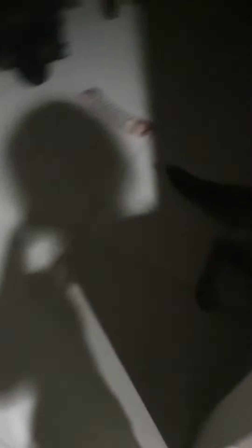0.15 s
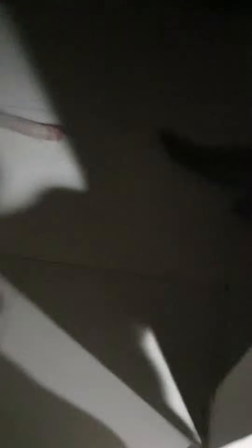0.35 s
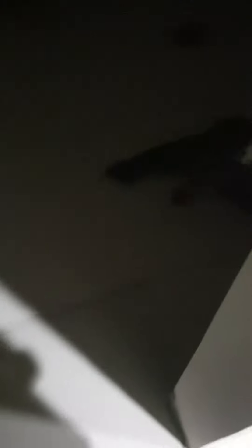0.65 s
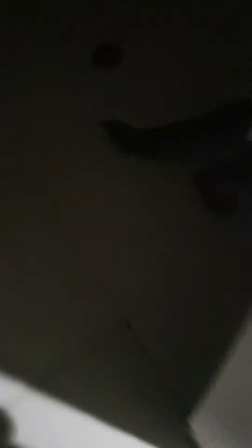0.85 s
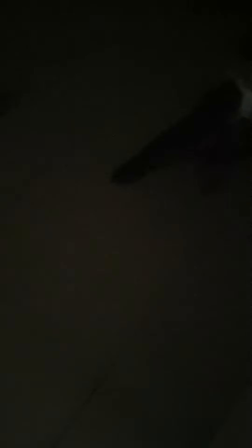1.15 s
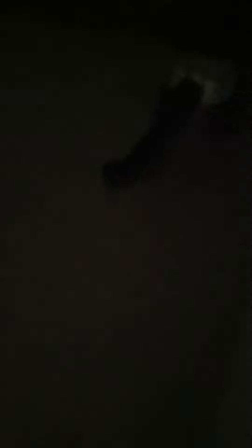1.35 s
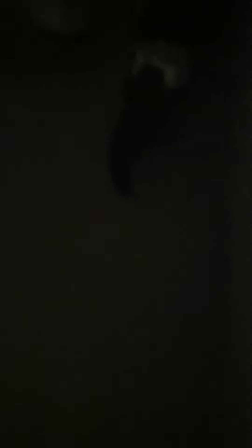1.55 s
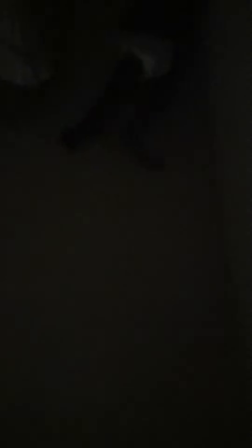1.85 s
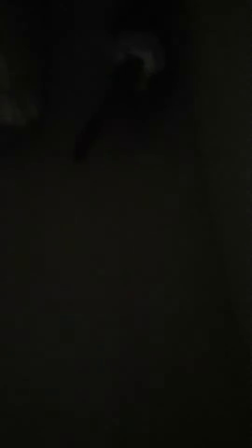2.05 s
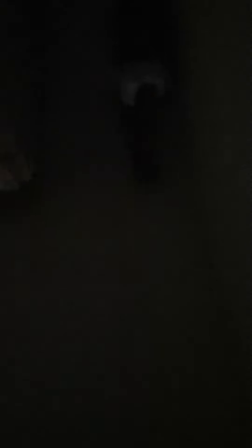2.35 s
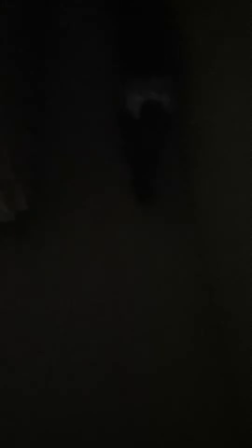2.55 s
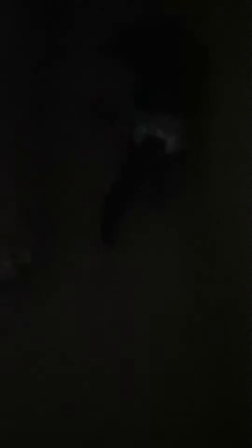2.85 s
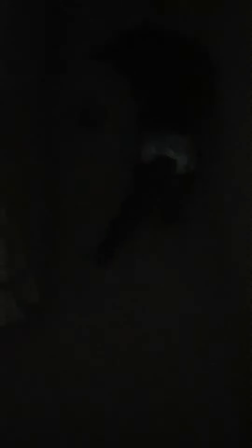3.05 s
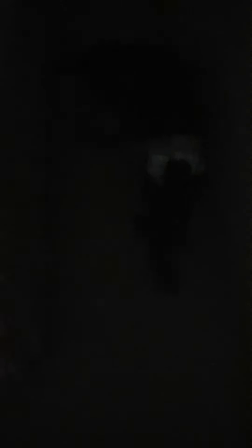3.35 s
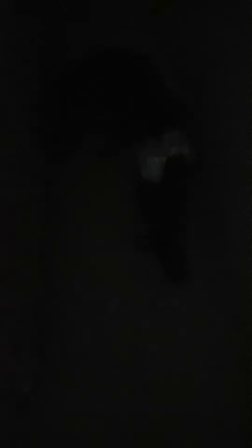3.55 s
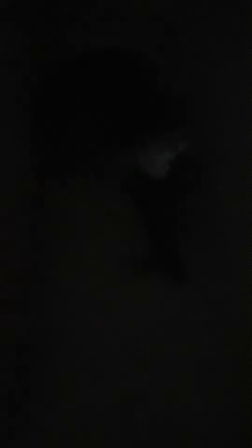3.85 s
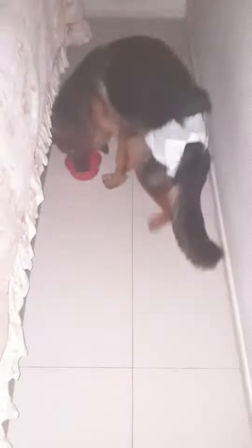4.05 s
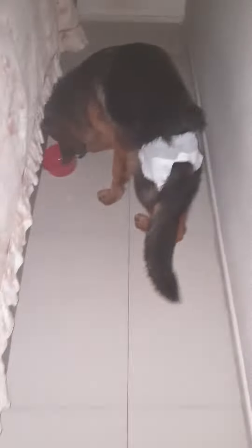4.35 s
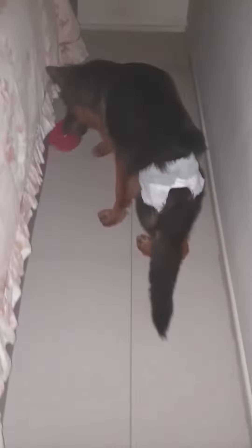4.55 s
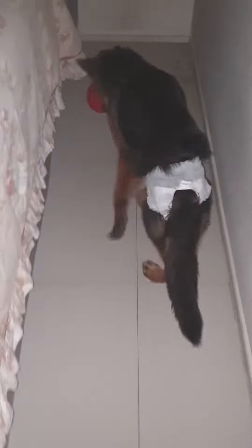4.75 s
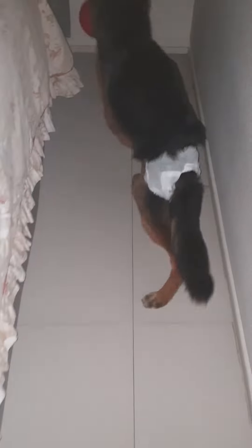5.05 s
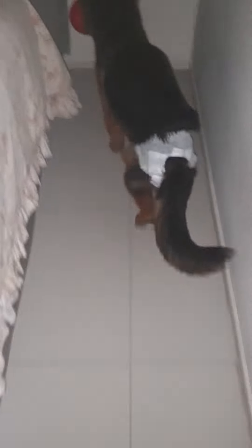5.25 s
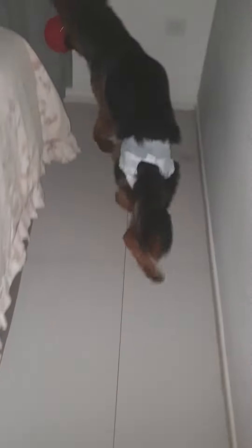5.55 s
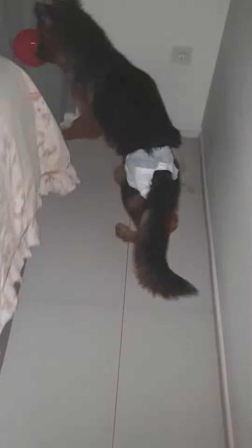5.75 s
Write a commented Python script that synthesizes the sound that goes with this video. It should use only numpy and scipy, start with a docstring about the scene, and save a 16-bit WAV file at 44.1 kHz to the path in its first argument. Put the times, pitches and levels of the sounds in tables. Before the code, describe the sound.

A soft, low house murmur runs throughout, swelling slightly near 1.7 s. Faint airy scuffs open the clip, followed by tiny claw ticks at 0.5 s and from 1.2 to 1.75 s, with very dull footfalls. At 1.8 s a hollow plastic ball knocks the tiles in a quick cluster, then rolls and scuffs faintly under a barely audible hum. A sharp slap at 2.3 s precedes the loudest event: hollow, hard clacks at 2.55-2.63 s, fluttering off close walls with a brief ringing tail. Lighter knocks, claws, pad hiss and rolling continue from 2.75 to 3.7 s, including a crisp slap at 3.3 s and a small low phone jolt just before it. At 4.1-4.2 s a slap and a higher-pitched ball pop sound, then busy claw ticks and thuds until 4.5 s. The rest is quiet, with sparse ticks, faint scuffs and soft low handling movements until 5.9 s.

```python
"""A quiet house murmurs and a brief soft scuff or two passes, then claws tick on tiles.
A young dog chases a hollow plastic ball along a tiled passage, a few metres from a hand-held phone.
Ball and footfalls are ringing modes, claws are band-passed clicks, rolling and scuffs are shaped noise.
Hard walls ring on as echoes and a noise tail; jolts of the phone are short low swings, a faint hum a sine."""
import sys
import numpy as np
from scipy import signal
from scipy.fft import rfft, irfft
from scipy.io import wavfile
from scipy.ndimage import uniform_filter1d

SR = 44100
rng = np.random.default_rng(int(sys.argv[2]) if len(sys.argv) > 2 else 0)


def log_audio(samples):
    """Write samples as a 16-bit WAV file to the path given in sys.argv[1]."""
    # one column per channel
    frames = np.atleast_2d(samples).T
    # limit to full scale, then quantise
    limited = np.clip(frames, -1, 1)
    pcm = np.round(limited * 32767).astype(np.int16)
    wavfile.write(sys.argv[1], SR, pcm)


N = 259749


def undb(db):
    """Gain of a level in dB."""
    return 10 ** (np.asarray(db) / 20)


def band(x, hz, octaves, order=2):
    """Band-pass around hz."""
    edge = np.clip(hz * 2. ** np.array([-octaves / 2, octaves / 2]), 10, .48 * SR)
    return signal.sosfilt(signal.butter(order, edge, "band", fs=SR, output="sos"), x)


def unit(x):
    """Scale to rms 1."""
    return x / np.sqrt(np.mean(x ** 2))


def noise(hz, octaves, size=N):
    """Band noise of rms 1."""
    return unit(band(rng.standard_normal(size), hz, octaves))


def walk(rate):
    """Random levels held 1 / rate s and slewed twice; spread near 1."""
    k = int(SR / rate)
    steps = np.repeat(rng.standard_normal(N // k + 1), k)
    return 1.3 * uniform_filter1d(uniform_filter1d(steps, k), k)[:N]


def curve(rows, index=1):
    """A column of a table at every sample."""
    rows = np.array(rows, float)
    return np.interp(np.arange(N) / SR, rows[:, 0], rows[:, index])


def gate(rows):
    """1 while a table lasts, with short fades."""
    start, end = rows[0][0], rows[-1][0]
    return curve([(start - .03, 0), (start, 1), (end, 1), (end + .04, 0)])


def ring(hz, db, t60, attack=.0004):
    """Sum of decaying modes after a blow that lasts attack seconds."""
    t = np.arange(SR // 5) / SR
    hz, db, t60 = (np.reshape(v, (-1, 1)) for v in (hz, db, t60))
    modes = undb(db) * np.sin(2 * np.pi * hz * t) * 1000. ** (-t / t60)
    return np.sum(modes, axis=0) * (1 - np.exp(-t / attack))


SCRATCH_S = 0.0023  # decay constant of the chatter of a hard contact


def click(hz, octaves, db):
    """A hard contact with the energy of one spike: direct as a short chatter, to the walls as an even pulse."""
    t = np.arange(SR // 16) / SR
    spike = band(np.eye(1, len(t))[0], hz, octaves)
    grit = rng.standard_normal(len(t)) * np.exp(-t / SCRATCH_S)
    chatter = unit(band(grit, hz, octaves)) * np.std(spike)
    return undb(db) * np.array([chatter, chatter, spike, spike]) / np.max(np.abs(spike))


def add(out, s, x, pan_db, wall_db=0.):
    """Mix a sound at time s into the direct pair (rows 0-1) and the pair that feeds the walls (rows 2-3)."""
    i = int(s * SR)
    n = min(x.shape[-1], N - i)
    left_db, right_db = pan_db / 2, -pan_db / 2
    out[:, i:i + n] += x[..., :n] * undb([[left_db], [right_db], [wall_db + left_db], [wall_db + right_db]])


# spectrum of the murmur: f/Hz, relative level/dB per Hz
HOUSE_SPECTRUM = [(15, -44), (25, -16.5), (59, -8.5), (149, -10), (195, -4), (256, 0), (301, -2), (503, -8),
                  (659, -11), (1940, -28.5), (3430, -34), (8140, -38.5), (12500, -28.5), (16000, -32.5)]
# slow swell of the murmur below 1500 Hz: t/s, relative level/dB
MURMUR_SWELL = [(0, 0.1), (.7, 2.1), (1.3, 3.3), (1.7, 5.5), (2.5, 1.5), (4.6, 1.2), (4.95, -3), (5.3, 1.6),
                (5.6, 0), (5.89, 3.5)]
HOUSE_DB, SWELL_DB, FLICKER_DB = -60, 1.2, 0.38  # mean level; spread of the shared and single-band wander


def house():
    """Third-octave noise; below 1500 Hz bands swell together and flicker alone, partly alike at both ports."""
    out, swell, murmur_db = 0, walk(5.6), curve(MURMUR_SWELL)
    table_hz, table_db = np.transpose(HOUSE_SPECTRUM)
    for hz in 28 * 2 ** np.arange(0, 9.2, 1 / 3):
        low = hz < 1500
        # level per Hz becomes level per band
        db = np.interp(np.log(hz), np.log(table_hz), table_db) + 10 * np.log10(hz)
        db = db + low * (SWELL_DB * swell + FLICKER_DB * walk(24) + murmur_db)
        alike = np.clip(1 - hz / 990.0, 0, .95) if hz > 90 else .3
        mid = np.sqrt(1 + alike) * noise(hz, 1 / 3)
        side = np.sqrt(1 - alike) * noise(hz, 1 / 3)
        out = out + undb(db) * np.array([mid + side, mid - side])
    return unit(out) * undb(HOUSE_DB + np.array([[-2.2], [2.2]]))


# two visits of a faint hum, one list each: t/s, f/Hz, level/dB (rms, before its flicker)
HUM_VISITS = [
    [(1.95, 300, -60.5), (2.2, 301, -61), (2.3, 298, -59.5), (2.5, 302, -58)],
    [(5.6, 300, -73), (5.78, 297, -66.5), (5.89, 300, -65)],
]


def hum():
    """A faint sine of drifting pitch and flickering level that comes and goes twice."""
    tone = 0
    for rows in HUM_VISITS:
        level = undb(curve(rows, index=2) + 4.5 * walk(24))
        tone = tone + gate(rows) * level * np.sin(2 * np.pi * np.cumsum(curve(rows)) / SR)
    return np.sqrt(2) * tone * undb([[-2], [2]])


# colour of the microphone ports: f/Hz, level/dB
PORT_COLOUR = [(20, -17.5), (120, -3.5), (700, -0.6), (1700, -2.5), (2050, -0.5), (2400, -2), (2750, 1),
               (3100, 0), (5000, -0.5), (8500, -1.5), (12000, -1), (15000, -6)]


def ports(x):
    """Causal filter with the colour of the microphone ports, from the cepstrum of its log gain."""
    hz, db = np.transpose(PORT_COLOUR)
    grid = np.maximum(np.arange(2049) * SR / 4096, 1)
    cepstrum = irfft(np.log(undb(np.interp(np.log(grid), np.log(hz), db))))
    # folding the cepstrum onto positive times makes the filter minimum-phase
    cepstrum[1:2048] *= 2
    cepstrum[2049:] = 0
    return signal.fftconvolve(x, irfft(np.exp(rfft(cepstrum)))[None], axes=1)[:, :N]


# bands of the tail: f/Hz, t60/s, level/dB, likeness of left and right (0-1)
TAIL_BANDS = [(83.5, 0.4, -20.5, .85), (167, 0.41, -16.5, 1), (383, 0.19, -14.5, 0.5), (720, 0.45, -17, 0),
              (1370, 0.33, -13, 0), (2670, 0.44, -17.5, 0.2), (5430, 0.4, -17.5, 0.6),
              (12200, .3, -17, 0.08)]
# first echoes off the walls: left delay t/s, right delay t/s, level/dB
WALL_ECHOES = [(.0098, 0.01, -1), (.0212, .0206, -17), (0.029, .0316, -15)]
# direct path, then the tiles and skirting just around a blow: left delay t/s, right delay t/s, level/dB
NEAR_PATHS = [(.0001, 0., -1.5), (.00025, .00032, -7), (.0022, .0024, -13), (.0036, .0033, -14)]


def passage(x):
    """The direct pair gets close reflections; the wall pair gets first echoes and a dense banded tail."""
    t, tail, near = np.arange(SR) / SR, 0, np.zeros((2, SR // 100))
    for hz, t60, db, alike in TAIL_BANDS:
        likeness = np.clip(alike, 0, 1)
        mid = np.sqrt(1 + likeness) * noise(hz, 0.97, size=SR)
        side = np.sqrt(1 - likeness) * noise(hz, 0.97, size=SR)
        decay = undb(db) * np.sqrt(hz / SR) * 1000. ** (-t / t60)
        tail = tail + decay * np.array([mid + side, mid - side])
    # the tail needs a few wall crossings to build up
    tail = tail * (1 - np.exp(-(t / .007) ** 2))
    for paths, rows in ((tail, WALL_ECHOES), (near, NEAR_PATHS)):
        for left_s, right_s, db in rows:
            paths[[0, 1], [int(left_s * SR), int(right_s * SR)]] += undb(db)
    direct = signal.fftconvolve(x[:2], near, axes=1)[:, :N]
    walls = signal.fftconvolve(x[2:], tail, axes=1)[:, :N]
    return direct + walls


# share of a blow that feeds the walls, as the play moves away and near: t/s, level/dB
WALL_SHARE = [(0.5, -6), (1.25, -3.5), (1.8, -8.5), (2.5, 0.5), (2.9, -15), (3.25, -7.5), (3.45, -9.5),
              (4.0, -7), (4.15, -9.5), (4.4, -13), (5.0, -9)]


def wet_db(s):
    """Share to the walls at time s, before each source's own offset."""
    return np.interp(s, *np.transpose(WALL_SHARE))


# jolts and sways of the phone: t/s, level/dB, f/Hz, half length t/s, left minus right level/dB
PHONE_JOLTS = [(3.231, -40.5, 59, 0.013, 29.5), (3.69, -52, 61.2, 0.012, 19),
               (4.662, -56.5, 55.9, 0.084, 2.5), (5.07, -64, 100.5, 0.039, -5),
               (5.345, -60.5, 100, 0.029, -5), (5.622, -65, 93.3, 0.045, -0.5)]


def jolts():
    """The phone's body swings low and briefly when the hand knocks it or the holder steps."""
    out, t = np.zeros((2, N)), np.arange(N) / SR
    for s, db, hz, half_s, pan_db in PHONE_JOLTS:
        swing = np.sin(2 * np.pi * hz * (s - t)) * np.exp(-((t - s) / half_s) ** 2)
        out += undb([[db + pan_db / 2], [db - pan_db / 2]]) * swing
    return out


# pads and fur sliding: start t/s, length before the fade t/s, level/dB before its grain, lowest f/Hz
PAD_SCUFFS = [(0., 0.074, -77, 4800), (0.088, 0.11, -63.5, 7900), (0.881, 0.19, -75, 1400),
              (1.897, 0.29, -62.5, 1600), (2.834, 0.1, -52.5, 4760), (3.025, 0.17, -65.5, 5400),
              (3.357, 0.036, -58, 5900), (3.665, 0.087, -69.5, 7380), (5.079, 0.093, -71.5, 7200),
              (5.248, 0.069, -73.5, 7050), (5.602, .1, -74.5, 7340), (5.75, 0.091, -73.5, 7760)]
SCUFF_TOP_HZ, SCUFF_ATTACK_S, SCUFF_T60_S = 16300, 0.0078, 0.29


def scuffs():
    """Hiss of sliding pads: quick start, uneven grain, then a fade like that of the passage."""
    out, t = np.zeros((2, N)), np.arange(SR // 2) / SR
    for s, length, db, low_hz in PAD_SCUFFS:
        fade = 1000. ** (-np.maximum(t - length, 0) / SCUFF_T60_S)
        shape = np.minimum(t / SCUFF_ATTACK_S, 1) * fade
        hz, octaves = np.sqrt(low_hz * SCUFF_TOP_HZ), np.log2(SCUFF_TOP_HZ / low_hz)
        hiss = np.array([shape * noise(hz, octaves, size=len(t)) for _ in range(2)])
        i = int(s * SR)
        n = min(len(t), N - i)
        out[:, i:i + n] += undb(db) * hiss[:, :n]
    return out * undb(2.0 * walk(25)) * undb([[-2], [2]])


# claws and sharp slaps on tile: t/s, treble level/dB, middle level/dB, low level/dB,
# left minus right level/dB
CLAW_TICKS = [(0.4903, -40, -76, -78, -7), (0.4993, -44.5, -78, -82, 2), (1.1695, -44, -54, -55.5, -3),
              (1.3226, -35, -73, -62, -4), (1.4448, -51, -56, -52.5, -7), (1.5498, -49, -67, -79, -7.5),
              (1.7373, -38, -70, -70, -7), (1.751, -34.5, -58, -75, -2), (2.2819, -10, -14, -17, -5),
              (2.834, -31.5, -32.5, -45, -2), (2.8874, -44, -34, -52, -10), (2.8961, -36, -50, -32.5, -9),
              (3.0093, -36, -35, -44, -8), (3.016, -54, -54, -59, -3), (3.1037, -38.5, -42, -42, -2),
              (3.1893, -41.5, -48.5, -45.5, 7), (3.277, -37, -41, -46.5, 4),
              (3.3142, -19.5, -26, -36.5, -3), (4.01, -56, -64, -41.5, -1.5),
              (4.126, -20.5, -38, -19.5, 1.5), (4.133, -28, -33, -31, -18.5),
              (4.2704, -31.5, -35.5, -34.5, -7), (4.2868, -45, -57, -36, -1), (4.359, -40, -43, -45, -5),
              (4.383, -34, -37, -44, -7), (4.4314, -52, -56, -47.5, 0), (4.4871, -36, -38.5, -45.5, 1),
              (4.5052, -31.5, -33.5, -39.5, -8.5), (4.5159, -39, -50.5, -48.5, 8.5),
              (4.753, -49, -51, -57, -8), (5.1249, -50.5, -59, -63, -11.5), (5.1927, -33, -62.5, -60, -8),
              (5.5384, -39, -64.5, -48, -7.5), (5.7, -52.5, -63.5, -56, -5)]
# footfalls through the floor: t/s, level/dB, f/Hz
FOOTFALLS = [(0.673, -51, 58.6), (0.799, -57, 63.3), (1.133, -57, 62.6), (1.822, -27.5, 397),
             (1.835, -33, 252), (1.857, -37.5, 160), (2.284, -54, 166), (2.288, -40, 69),
             (3.546, -48, 198.5), (4.168, -43, 64.6), (4.47, -37, 129), (4.49, -38.5, 150),
             (4.506, -42.5, 177), (4.529, -47.5, 140)]
# band centres of claws in Hz: treble, middle, low, pad
CLAW_BANDS = 10740, 3350, 880, 330
PAD_BELOW_DB, CLAW_WET_DB = -9.5, -0.5  # pad against the low slap; claws' offset on the wall share
THUD_CYCLES, THUD_WALL_DB = 6.7, -3.5  # cycles to fall 60 dB; share of a footfall to the walls


def paws():
    """Claw ticks and slaps are broad clicks; footfalls are dull pushes on the floor."""
    out = np.zeros((4, N))
    treble_hz, middle_hz, low_hz, pad_hz = CLAW_BANDS
    for s, treble_db, middle_db, low_db, pan_db in CLAW_TICKS:
        tick = click(treble_hz, 0.8, treble_db) + click(middle_hz, 0.8, middle_db)
        slap = click(low_hz, 1.43, low_db) + click(pad_hz, 1.0, low_db + PAD_BELOW_DB)
        add(out, s, tick + slap, pan_db, wet_db(s) + CLAW_WET_DB)
    for s, db, hz in FOOTFALLS:
        add(out, s, ring(hz, db, THUD_CYCLES / hz, attack=0.00067), -3., THUD_WALL_DB)
    return out


# ball knocks, among them quick rattling rebounds of the ball at 2.574, 2.618 and 2.628 s: # t/s, hollow note
# level/dB, hollow note f/Hz, shell level/dB, crack level/dB, left minus right level/dB
BALL_KNOCKS = [(1.823, -25, 613, -31.5, -21.5, -6.5), (1.833, -20.5, 626, -51, -17, -3),
               (1.859, -30, 655.4, -30.5, -35, -2), (1.964, -37, 691, -33.5, -37, -9),
               (2.553, -8, 705, -13, -15.5, -1), (2.574, -18, 699, -26.5, -39, -10),
               (2.598, 1.5, 712, -16.5, -24, 9), (2.607, -18, 680, -7.5, -27.5, -5.5),
               (2.618, -6.5, 714, -33, -38, -8.5), (2.628, -17, 654, -52, -36, -10),
               (2.755, -36, 762, -62, -43, -10), (2.888, -28.5, 715, -35.5, -30, -3),
               (2.936, -27, 630, -71, -55, -3), (3.317, -38, 670, -39, -58.5, -1),
               (3.348, -40, 717, -43, -55, -5), (3.404, -33.5, 709, -58.5, -33.5, 2.5),
               (3.441, -39.5, 643, -45, -39.5, -16.5), (3.482, -39.5, 732, -47.5, -71.5, -5),
               (3.849, -37, 648, -42, -34.5, -5), (4.011, -43, 608, -51.5, -58, -4.5),
               (4.195, -20, 918, -39.5, -40, -4), (4.221, -33.5, 995, -53, -55, 4),
               (4.679, -50.5, 703, -62, -71.5, -6), (5.517, -48.5, 650, -61, -56, -5),
               (5.658, -50, 637, -66, -62, -2)]
# partials of the hollow note: multiple of its f, relative level/dB, t60/s before the choke
HOLLOW_PARTIALS = [(1., 0, .008), (1., -14, .2), (.93, -19, .12), (1.06, -19, .15), (.71, -20, .02),
                   (1.25, -14, .012), (1.6, -5, .006), (2.0, -6, .005)]
# stiff modes of the shell: f/Hz, relative level/dB, t60/s
SHELL_MODES = [(1250, -1, 0.0036), (1950, -5, 0.0085), (2980, -14, 0.042), (3184, 4.5, 0.0052),
               (3890, 3, 0.004), (4900, -12.5, 0.0094)]
# the ball rolling and skidding: swell's top t/s, half length t/s, shell rasp level/dB,
# hollow rumble level/dB
BALL_ROLLS = [(1.933, 0.028, -59.5, -70), (2.017, 0.061, -88, -70.5), (2.103, .07, -63, -75),
              (2.722, 0.11, -69, -50.5), (2.925, 0.076, -91, -63), (3.138, 0.062, -76, -97),
              (3.418, 0.095, -88, -57.5), (3.635, 0.14, -91.5, -75.5)]
THUD_BELOW_DB, THUD_HZ, THUD_T60_S = -21.5, 267, .052  # the tile thuds under the hollow note
HELD_T60_S = 0.15  # jaws and paws choke the long ring
FREE_HZ, SQUEEZE_POWER = 720, 3.4  # a squeezed ball sounds above FREE_HZ; its longest ring is shorter
LOUD_DB, DRIER_DB_PER_DB = -19, 1.07  # rows over LOUD_DB are nearer, so drier
CRACK_WET_DB = 2.5  # cracks' offset on the wall share


def ball():
    """Each knock or rebound sums hollow note, shell modes, crack and thud; at times the ball rolls."""
    out, t = np.zeros((4, N)), np.arange(N) / SR
    ratio, hollow_db, hollow_t60 = np.transpose(HOLLOW_PARTIALS)
    shell_hz, shell_db, shell_t60 = np.transpose(SHELL_MODES)
    # each row weights the shell modes anew, as blows land on other spots
    spots_db = 2.0 * rng.standard_normal((len(BALL_KNOCKS), len(SHELL_MODES)))
    for (s, db, hz, stiff_db, crack_db, pan_db), spot_db in zip(BALL_KNOCKS, spots_db):
        longest_t60 = HELD_T60_S * min(FREE_HZ / hz, 1) ** SQUEEZE_POWER
        hollow = ring(hz * ratio, db + hollow_db, np.minimum(hollow_t60, longest_t60))
        shell = ring(shell_hz, stiff_db + shell_db + spot_db, shell_t60)
        thud = ring(THUD_HZ, db + THUD_BELOW_DB, THUD_T60_S)
        drier_db = DRIER_DB_PER_DB * max(max(db, stiff_db) - LOUD_DB, 0)
        add(out, s, hollow + shell + thud, pan_db, wet_db(s) - drier_db)
        add(out, s, click(11000, 1.6, crack_db), pan_db, wet_db(s) + CRACK_WET_DB)
    # uneven grit excites the shell and the hollow while the ball rolls
    grit = rng.standard_normal(N) * undb(8.5 * walk(67))
    shell_ring = unit(signal.fftconvolve(grit, ring(shell_hz, shell_db, shell_t60))[:N])
    rasp = 0.25 * shell_ring + unit(band(grit, 2300, 1.4))
    rumble = unit(signal.fftconvolve(grit, ring(690 * ratio, hollow_db, hollow_t60))[:N])
    for s, half_s, rasp_db, rumble_db in BALL_ROLLS:
        swell = np.exp(-((t - s) / half_s) ** 2)
        roll = swell * (rasp * undb(rasp_db) + rumble * undb(rumble_db))
        out += roll * undb([[-2], [2], [-2], [2]])
    # so small a body radiates little deep bass
    return signal.sosfilt(signal.butter(2, 170, "high", fs=SR, output="sos"), out)


def scene():
    """Ball and paws pass the passage and ports, scuffs only the ports; jolts shake the capsules directly."""
    floor = passage(ball() + paws()) + scuffs()
    return house() + hum() + jolts() + ports(floor)


TOP_HZ = 15850  # upper edge of the sound band


def record(dry):
    """Clip at full scale and low-pass at TOP_HZ."""
    low_pass = signal.ellip(8, .2, 60, TOP_HZ, fs=SR, output="sos")
    return signal.sosfilt(low_pass, np.clip(dry, -1, 1))


dry = scene()
out = record(dry)
log_audio(out)
```